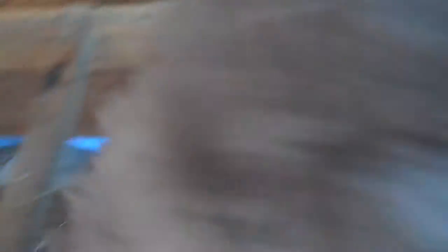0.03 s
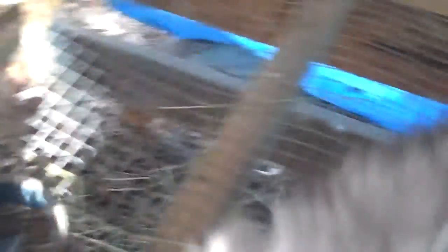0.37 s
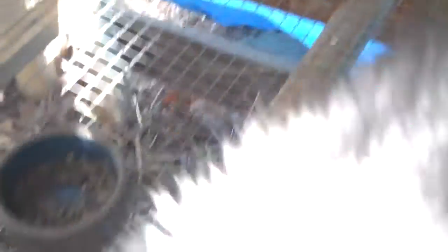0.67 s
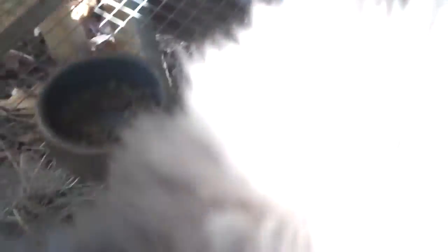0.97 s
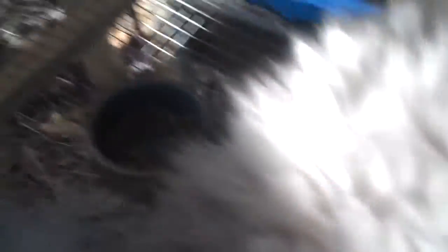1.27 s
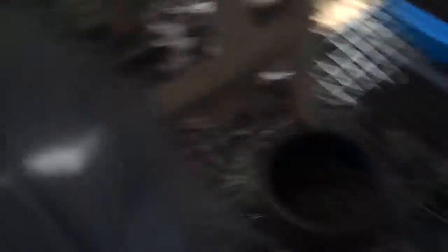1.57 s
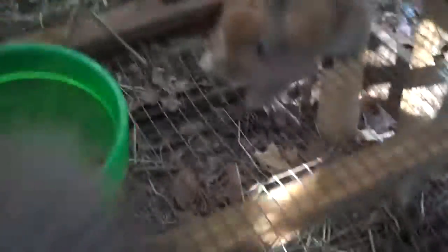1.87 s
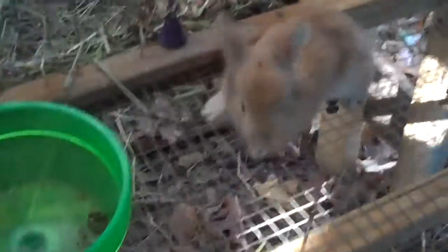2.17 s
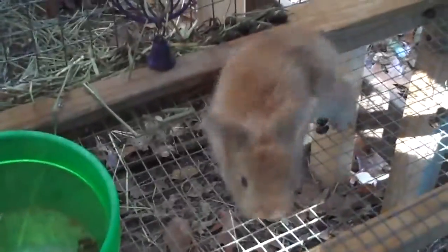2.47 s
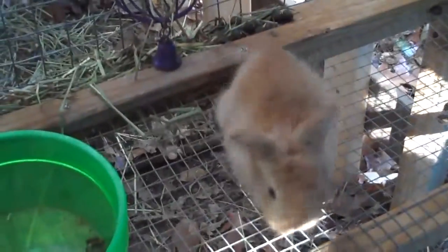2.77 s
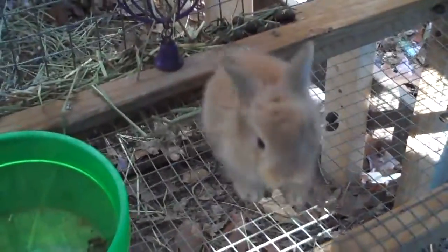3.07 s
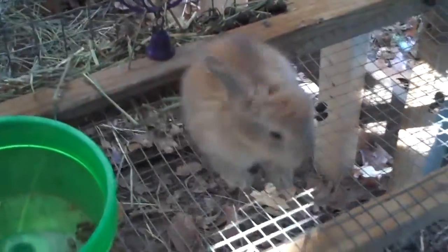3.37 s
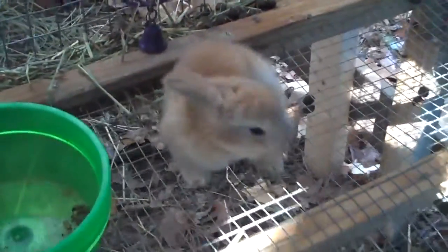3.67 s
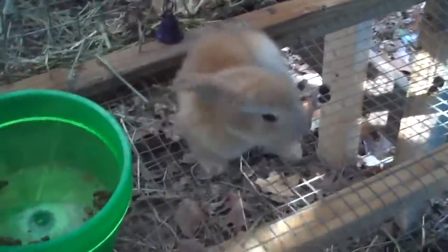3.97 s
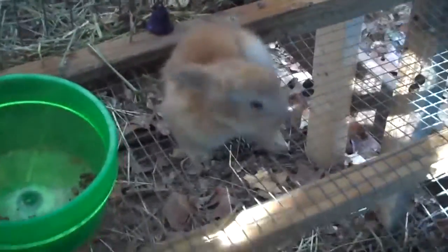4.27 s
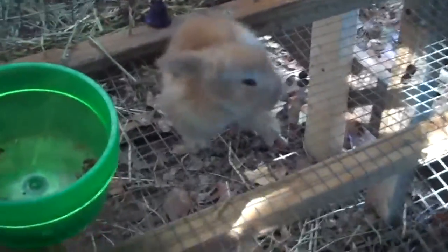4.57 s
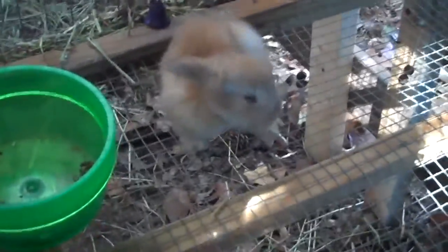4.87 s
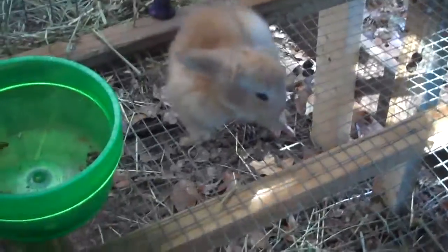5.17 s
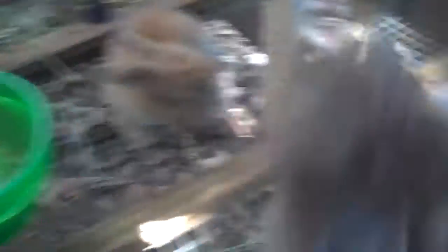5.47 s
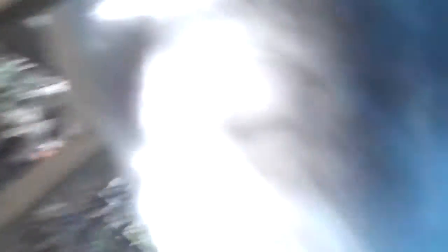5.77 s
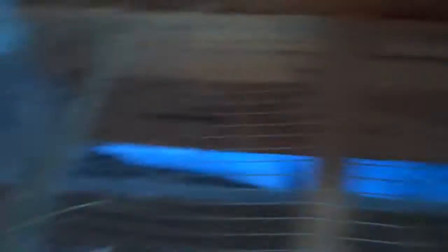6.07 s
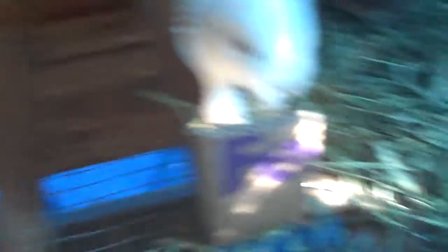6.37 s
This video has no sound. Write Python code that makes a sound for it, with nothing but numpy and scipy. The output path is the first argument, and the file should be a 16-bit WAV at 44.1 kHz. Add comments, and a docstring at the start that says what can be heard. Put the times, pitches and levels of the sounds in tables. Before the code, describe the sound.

Rabbits shuffle over dry hay and wire in an outdoor hutch, with irregular crackling, soft bumps and scratchy microphone handling near the end.

```python
"""A wooden hutch outdoors, where rabbits shuffle close by over dry hay and a wire floor.
Stalks slide and snap in swarms of tiny fractures, which the hutch colours with a short hollow ring.
Paws bump the boards and pluck the mesh; thin far whistles, perhaps birds, sound over a faint hush.
Near the end a hand-held camera pushes past fur into the hay, and its case is scratched and rubbed."""
import sys
import numpy as np
from scipy import signal
from scipy.fft import rfft, irfft, next_fast_len
from scipy.io import wavfile
from scipy.ndimage import uniform_filter1d

SR = 44100
rng = np.random.default_rng(int(sys.argv[2]) if len(sys.argv) > 2 else 0)


def unload_audio(sound):
    """Save the sound as a 16-bit wav file, at the path given as the first command line argument."""
    columns = np.transpose(np.atleast_2d(sound))
    # keep every value between -1 and 1, then stretch to whole-number steps
    steps = np.round(np.clip(columns, -1, 1) * 32767)
    wavfile.write(sys.argv[1], SR, steps.astype(np.int16))


N = 292383

# Still outdoor air. Each row: frequency in Hz, relative spectral level in dB.
AIR_SPECTRUM = [(4, -10), (15, 15), (28, 2.5), (70, -2), (150, -2.5), (300, -3.5), (600, -1.5), (1200, 0),
                (2500, -7.5), (5000, -10.5), (8000, -11.5), (13500, -25)]
# Far whistles. Each row: start in seconds, length in seconds, pitch in Hz, level in dB.
FAR_WHISTLES = [(1.0, 0.25, 5300, -69), (2.801, 0.4, 5300, -68.5), (4.615, 0.054, 3180, -60.5),
                (4.705, 0.41, 5760, -71), (4.7, 0.33, 7450, -75), (5.002, .06, 3520, -65),
                (5.734, 0.037, 3500, -62)]
# Rubs of the hand on the camera. Each row: start in seconds, length in seconds, first pitch in Hz,
# last pitch in Hz, relative level in dB.
GRIP_RUBS = [(5.972, .06, 450, 350, -51), (5.999, 0.078, 320, 221, -53.5), (6.082, 0.06, 430, 385, -49.5),
             (6.213, 0.086, 375, 345, -62), (6.312, 0.079, 381, 357, -50.5), (6.34, .13, 240, 235, -63.5)]
# Soft blows on boards and case. Each row: start in seconds, relative level in dB, centre in Hz.
SOFT_BUMPS = [(0.102, -35, 630), (0.1211, -42, 640), (0.124, -52.5, 170), (0.35, -57.5, 171),
              (2.214, -45, 650), (2.234, -53, 150), (2.325, -56, 420), (2.691, -52, 478), (5.805, -48, 243),
              (5.901, -46.5, 376), (6.078, -36.5, 605), (6.08, -53, 150), (6.111, -47.5, 426),
              (6.33, -41.5, 750), (6.618, -44, 447)]
# Paws plucking the wire floor. Each row: start in seconds, relative level in dB.
WIRE_PLUCKS = [(0.2, -47), (3.505, -41), (3.545, -48), (3.584, -50), (3.995, -56), (4.592, -62)]
# Modes of the wire floor. Each row: frequency in Hz, relative level in dB, seconds to decay by 60 dB.
WIRE_MODES = [(1366, -12, .07), (2000, -5.5, 0.24), (2100, -11.5, 0.12), (3150, -6, .08), (3890, -4, 0.052)]
# Resonances of the hutch. Each row: frequency in Hz, bandwidth in Hz, gain in dB re the direct sound.
HUTCH_MODES = [(410, 160, 1.5), (656, 70, -22), (770, 48, -7), (1530, 320, -8.5), (2127, 43, -19)]
# Dry stalks cracking. Each row: frequency in Hz, relative spectral level in dB.
STRAW_SPECTRUM = [(40, -34), (120, -15.5), (250, -11), (500, -3.5), (900, 0.5), (1250, -0.5), (2000, 1.5),
                  (3200, 1.5), (4500, -0.5), (7000, -1.5), (9500, -6.5), (13500, -13.5)]
# Single stalks breaking. Each row: start in seconds, peak level in dB.
STALK_SNAPS = [(0.0269, -32), (0.097, -31), (0.232, -31.5), (0.435, -45), (0.858, -34), (1.4704, -46),
               (1.493, -41), (1.585, -30), (3.5432, -39), (4.674, -27), (5.352, -45), (5.7055, -51),
               (5.876, -35), (5.9675, -25.5), (6.1426, -27), (6.4295, -21)]
# Tufts crushed or scraped in one go. Each row: start in seconds, length in seconds, relative level
# in dB, treble in dB re the middle band, resonance in Hz, resonance gain in dB.
TUFT_CRUNCHES = [(0.007, 0.01, -46.5, -11, 1160, 6), (0.025, 0.0063, -42, -13, 2600, -2),
                 (0.076, 0.014, -45.5, -10, 1050, 9), (0.094, 0.012, -30, -3.5, 2120, 2),
                 (0.199, 0.0043, -42.5, -8, 1850, 7), (0.214, 0.0048, -42.5, -5, 2100, -3),
                 (0.228, 0.005, -39, -8.5, 1000, -8), (0.325, 0.013, -47.5, -1, 2800, 0),
                 (0.434, 0.0032, -49.5, 4.5, 7000, 4), (0.553, .007, -51.5, 6.5, 1000, -12),
                 (0.857, .016, -50, 2, 1010, -10), (0.943, 0.017, -52.5, -1.5, 5160, -10),
                 (1.429, 0.043, -47, -7, 2810, 7), (1.463, 0.014, -47, -8, 3330, 20),
                 (1.492, .018, -51.5, -4, 3130, 15), (1.573, 0.022, -42.5, -7.5, 2980, 11),
                 (1.601, 0.0094, -44, -16, 3070, 13), (1.732, 0.0054, -51, -9, 3150, -4),
                 (1.899, .012, -52.5, -9, 870, 5), (2.089, 0.0094, -47.5, -3.5, 3000, -4),
                 (2.12, .017, -49.5, -4.5, 1600, -10), (2.202, 0.011, -40.5, -8.5, 2190, 5),
                 (2.218, 0.014, -43.5, -5, 1300, -10), (2.266, .01, -46, -0.5, 2900, -10),
                 (2.287, 0.027, -54, -14, 1200, -8), (2.323, 0.0061, -53, 3.5, 700, -10),
                 (2.338, .008, -54.5, 6.5, 1200, -10), (2.407, .009, -64.5, 8, 1000, -10),
                 (2.512, 0.004, -58, 8, 6400, -15), (2.649, 0.012, -53.5, 0, 1020, 20),
                 (2.68, 0.015, -41.5, -6.5, 1120, 15.5), (3.504, 0.014, -51, -9, 2030, 1),
                 (3.544, .026, -50.5, -0.5, 2090, -2), (3.584, 0.021, -53, -.5, 3100, 2),
                 (3.699, 0.026, -60.5, 0, 3150, -10), (3.775, .005, -57.5, -4, 1350, 17),
                 (3.852, 0.022, -59.5, -0.5, 1430, -10), (3.991, 0.034, -49.5, 0.5, 1670, 7),
                 (4.24, .005, -55, -12, 704, 11), (4.59, 0.0051, -47, -14, 2080, 8),
                 (4.673, .023, -52, 3, 4320, 2), (4.916, .006, -54, -9, 805, 13),
                 (5.037, 0.023, -55.5, -9, 3550, 8), (5.351, 0.0033, -49, -6, 850, 5),
                 (5.434, 0.0076, -49.5, 1.5, 1730, 15), (5.471, 0.034, -56.5, 6.5, 1550, 9),
                 (5.608, 0.018, -54.5, -1.5, 3700, 15), (5.703, .004, -49.5, 4.5, 7300, -4),
                 (5.793, 0.0071, -45, -5, 1100, -8), (5.798, .017, -41, -9, 990, 5),
                 (5.822, 0.0068, -46, 6.5, 700, -15), (5.875, 0.0039, -54.5, 12, 5450, -10),
                 (5.895, 0.022, -50.5, -15, 730, 8), (5.941, 0.0086, -46, -1.5, 2000, -9),
                 (5.965, .002, -35.5, -6, 2950, 8), (5.989, .017, -46.5, -4, 900, -13),
                 (6.066, 0.029, -46, -15, 694, 8), (6.1, 0.014, -40, -9, 740, -2),
                 (6.143, 0.0036, -44, -1, 2090, -10), (6.19, 0.0055, -39, 0, 1020, 10),
                 (6.3, 0.037, -42.5, -8, 827, 16), (6.334, 0.018, -38, -4, 1070, 5),
                 (6.43, 0.0054, -31, -2, 4200, 1), (6.488, .008, -45.5, 1, 700, -5),
                 (6.579, .003, -44.5, -1, 2600, 12), (6.6, 0.018, -45.5, -4, 750, -3),
                 (6.616, 0.014, -32, -4.5, 1700, 5)]
# Steady contact with the hay, faint until the camera pushes in. Each row: time in seconds, relative
# level in dB.
HAY_CONTACT = [(0, -63), (0.3, -62), (0.5, -64), (1.3, -60.5), (2.0, -66.5), (2.55, -68), (3.0, -63.5),
               (3.25, -65), (3.92, -67.5), (4.2, -60.5), (4.65, -63.5), (5.18, -70), (5.78, -65.5),
               (5.9, -57), (6.02, -51.5), (6.18, -46), (6.5, -42.5), (6.63, -51.5)]
# Shuffles of a rabbit. Each row: midpoint in seconds, length in seconds, relative level in dB, then
# body and treble, both in dB re the middle band.
RABBIT_SHUFFLES = [(0.005, 0.036, -51.5, -12, -2), (0.173, 0.18, -54.5, -3, -3),
                   (0.368, 0.091, -58, -4, -7), (0.599, 0.14, -58.5, -5.5, 4.5),
                   (0.776, 0.13, -55, -17, 3.5), (1.015, 0.097, -60.5, -9, -1.5),
                   (1.477, 0.11, -49, -28, -3), (1.596, .12, -53.5, -14, -2),
                   (1.804, 0.19, -61, -9.5, -4.5), (2.115, .12, -56, -10, -1),
                   (2.268, .11, -47.5, -6, -8.5), (2.429, 0.076, -60.5, -10, -0.5),
                   (2.686, 0.12, -55, -7.5, -5), (2.8, 0.05, -60, -5, -2.5), (2.987, 0.038, -59, -11, -4),
                   (3.16, 0.066, -57.5, -16, 2), (3.368, 0.16, -59.5, -10, -27), (3.47, .05, -62, -13, 2.5),
                   (3.58, 0.11, -56.5, -14, -7), (3.794, .09, -64, -8, 1), (4.06, 0.2, -57.5, -9, -5),
                   (4.55, 0.19, -62.5, -4, 2.5), (4.914, 0.26, -68, -5, 1), (5.257, 0.055, -63, -3, -3),
                   (5.426, 0.1, -61, -4.5, 1.5), (5.835, 0.037, -53, -2, -9)]

LN_1000 = np.log(1000)  # exponent of a 60 dB decay


def undb(db):
    """Amplitude ratio for a level in decibels."""
    return 10 ** (np.asarray(db) / 20)


def unit(x):
    """Normalisation to an rms of one."""
    return x / np.sqrt(np.mean(x ** 2) + 1e-20)


def add(out, start, x):
    """Superposition of x on out from a start in seconds."""
    i = int(np.clip(start * SR, 0, N - 1))
    out[i:i + len(x)] += x[:N - i]


def shape(x, response):
    """Linear filtering: the spectrum of x is multiplied by a frequency response."""
    size = next_fast_len(len(x) + 4096)
    f = np.maximum(np.arange(size // 2 + 1) * SR / size, 1)
    return irfft(rfft(x, size) * response(f), size)[:len(x)]


def spectrum(f, points):
    """Gain at f, interpolated between (Hz, dB) points on logarithmic axes."""
    hz, db = np.transpose(points)
    return undb(np.interp(np.log(f), np.log(hz), db))


def mode(f, hz, width):
    """Response of a damped resonator, unity at its centre."""
    return 1 / (1 + 1j * (f * f - hz * hz) / (f * width))


def below(f, hz):
    """Low-pass response falling 36 dB an octave."""
    return 1 / (1 + (f / hz) ** 6)


def bands(x, body_hz=900, treble_hz=5000):
    """Crossover into body, middle and treble, each with an rms of one."""
    return (unit(shape(x, lambda f: below(f, body_hz))),
            unit(shape(x, lambda f: below(f, treble_hz) - below(f, body_hz))),
            unit(shape(x, lambda f: 1 - below(f, treble_hz))))


def wander(rate):
    """Random modulation: straight lines join Gaussian values, rate of them a second."""
    step = int(SR / rate)
    return uniform_filter1d(np.repeat(rng.standard_normal(N // step + 1), step), step)[:N]


def cracks(n, rate, spread_db):
    """Brittle fracture as a Poisson process: rate impulses a second, many faint and a few strong."""
    happens = rng.random(n) < rate / SR
    strength = np.minimum(rng.exponential(size=n), 4.5)
    return happens * rng.choice([-1, 1], n) * undb(spread_db * strength)


def straw_in_hutch(x, early_db, early_t60=0.045, late_db=-7.0, late_t60=0.18):
    """Source and filter: straw and hutch modes colour x, and the near boards add reverberation."""
    def colour(f):
        resonances = sum(undb(db) * mode(f, hz, width) for hz, width, db in HUTCH_MODES)
        return spectrum(f, STRAW_SPECTRUM) * (1 + resonances)
    t = np.arange(SR // 4) / SR
    early, late = (unit(rng.standard_normal(len(t)) * np.exp(-LN_1000 * t / t60) * (t > .0008))
                   for t60 in (early_t60, late_t60))
    echoes = (undb(early_db) * early + undb(late_db) * late) / np.sqrt(len(t))
    echoes[0] = 1  # direct sound
    return signal.fftconvolve(shape(x, colour), echoes)[:len(x)]


def air(level_db=-64):
    """Stationary ambient noise: a faint outdoor hush with a little rumble."""
    return undb(level_db) * unit(shape(rng.standard_normal(N), lambda f: spectrum(f, AIR_SPECTRUM)))


def whistles(width_share=0.11):
    """Narrow-band noise: high notes, smeared by distance into a soft hiss."""
    out = np.zeros(N)
    for start, length, hz, level_db in FAR_WHISTLES:
        n = int(length * SR)
        note = unit(shape(rng.standard_normal(n), lambda f: mode(f, hz, width_share * hz) ** 2))
        add(out, start, undb(level_db) * note * signal.windows.tukey(n, .5))
    return out


def grip_rubs(width_hz=82.0, gain_db=-3.0):
    """Cavity resonance: friction rings the hollow between hand and camera, falling as the grip shifts."""
    out = np.zeros(N)
    for start, length, first_hz, last_hz, level_db in GRIP_RUBS:
        n = int(length * SR)
        friction = rng.standard_normal(n) + 1j * rng.standard_normal(n)
        ring = signal.sosfilt(signal.butter(2, width_hz / 2, fs=SR, output="sos"), friction)
        slide = np.exp(2j * np.pi * np.cumsum(np.linspace(first_hz, last_hz, n)) / SR)
        add(out, start, undb(level_db + gain_db) * unit(np.real(ring * slide) * np.hanning(n)))
    return out


def bumps(rise_s=0.0016, decay_s=0.017, width_share=0.98, gain_db=-13.5):
    """Modal overlap: padded blows excite many damped modes of boards and case, merging into a thud."""
    out = np.zeros(N)
    t = np.arange(SR // 6) / SR
    for start, level_db, hz in SOFT_BUMPS:
        shake = rng.standard_normal(len(t)) * (1 - np.exp(-t / rise_s)) * np.exp(-t / decay_s)
        thud = unit(shape(shake, lambda f: mode(f, hz, width_share * hz) ** 2))
        add(out, start, undb(level_db + gain_db) * thud)
    return out


def wire_pings(detune=0.017, gain_db=-3.):
    """Free vibration: the plucked mesh rings, damped by hay, each spot tuned a little differently."""
    out = np.zeros(N)
    t = np.arange(SR // 5) / SR
    for start, level_db in WIRE_PLUCKS:
        for hz, mode_db, t60 in WIRE_MODES:
            spot_hz = hz * (1 + detune * rng.standard_normal())
            ping = np.sin(2 * np.pi * spot_hz * t) * np.exp(-LN_1000 * t / t60)
            add(out, start, undb(level_db + mode_db + gain_db) * ping)
    return out


def snaps(crack_s=0.00018, low_cut_hz=600.):
    """Impulse excitation: one thin stalk breaks close by and the hutch responds."""
    out = np.zeros(N)
    t = np.arange(SR // 10) / SR
    for start, peak_db in STALK_SNAPS:
        fracture = rng.standard_normal(len(t)) * np.exp(-t / crack_s)
        snap = straw_in_hutch(fracture, early_db=-1.0, early_t60=0.072)
        snap = shape(snap, lambda f: 1 / (1 + low_cut_hz / (1j * f)))
        add(out, start, undb(peak_db) * snap / np.abs(snap).max())
    return out


def crunches(rise_s=0.00035, release_s=0.0035, sag=0.48, width_share=0.17, gain_db=-1.0):
    """Forced resonance: a paw or the camera crushes a tuft, whose cracks ring the stalks and wire."""
    out = np.zeros(N)
    t = np.arange(SR // 5) / SR
    for start, length, level_db, treble_db, ring_hz, ring_db in TUFT_CRUNCHES:
        fade = np.exp(-sag * np.minimum(t / length, 1) - np.maximum(t - length, 0) / release_s)
        push = (1 - np.exp(-t / rise_s)) * fade
        burst = cracks(len(t), rate=9000., spread_db=1.64) * push
        burst = shape(burst, lambda f: 1 + undb(ring_db) * mode(f, ring_hz, width_share * ring_hz))
        if level_db > -41.5:  # heavy pushes break thick stalks, which have less fizz at the top
            burst = shape(burst, lambda f: below(f, hz=10900.))
        body, middle, treble = bands(straw_in_hutch(burst, early_db=-6.0, early_t60=0.049, late_db=-9.5))
        body_db = -6.5 - 8.5 * np.log2(ring_hz / 1000)  # thick stalks ring lower and have more body
        gain = undb(level_db + gain_db) * np.sqrt(length / t[-1])  # energy grows with the push's length
        add(out, start, gain * (middle + undb(body_db) * body + undb(treble_db) * treble))
    return out


def rustle(patches=4, cracks_per_s=11000., catch_db=1.78, tick_db=-11.0, gain_db=-1.0):
    """Stick-slip friction: stalks catch on each other and on fur; shuffles add to the contact's power."""
    t = np.arange(N) / SR
    contact_db = np.interp(t, *np.transpose(HAY_CONTACT))
    band_power = undb(contact_db + np.array([[-10.5], [0], [-2]])) ** 2  # body, middle, treble
    for midpoint, length, level_db, body_db, treble_db in RABBIT_SHUFFLES:
        near = np.abs(t - midpoint) < 2 * length
        swell = np.exp(-np.abs(2 * (t[near] - midpoint) / length) ** 1.94)
        band_power[:, near] += swell * undb(level_db + np.array([[body_db], [0], [treble_db]])) ** 2
    # each patch of bedding has its own paths to the boards
    sliding = sum(straw_in_hutch(cracks(N, cracks_per_s / patches, spread_db=2.5), early_db=1.5)
                  for _ in range(patches))
    ticks = straw_in_hutch(cracks(N, rate=40., spread_db=1.5), early_db=4.0)  # stalks springing free
    hay = unit(sliding) * undb(catch_db * wander(rate=70)) + undb(tick_db) * unit(ticks)
    return undb(gain_db) * np.sum(np.sqrt(band_power) * bands(hay), axis=0)


def scene():
    """Superposition: the pressures of all sources add at one point."""
    return (air() + whistles() + grip_rubs() + bumps() + wire_pings() + snaps() + crunches()
            + rustle())[None]


def record(dry):
    """Band limiting: a steep low-pass removes the treble above 14 kHz."""
    return signal.sosfilt(signal.ellip(12, .1, 80, 14000, fs=SR, output="sos"), dry)


dry = scene()
out = record(dry)
unload_audio(out)
```